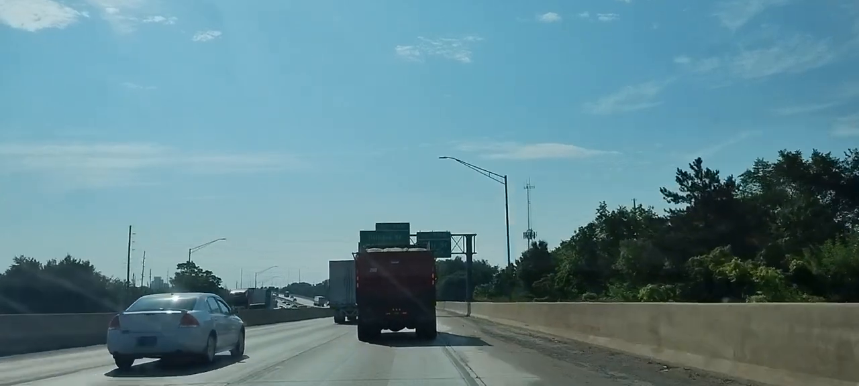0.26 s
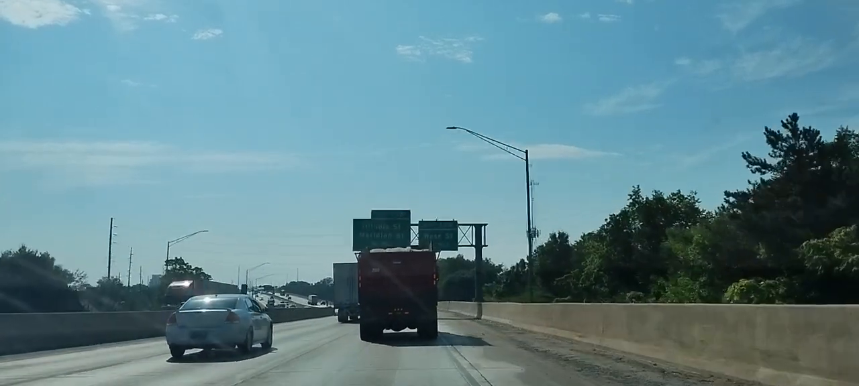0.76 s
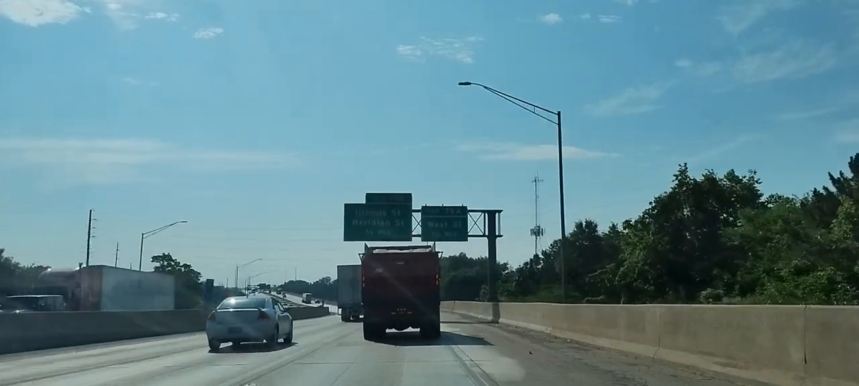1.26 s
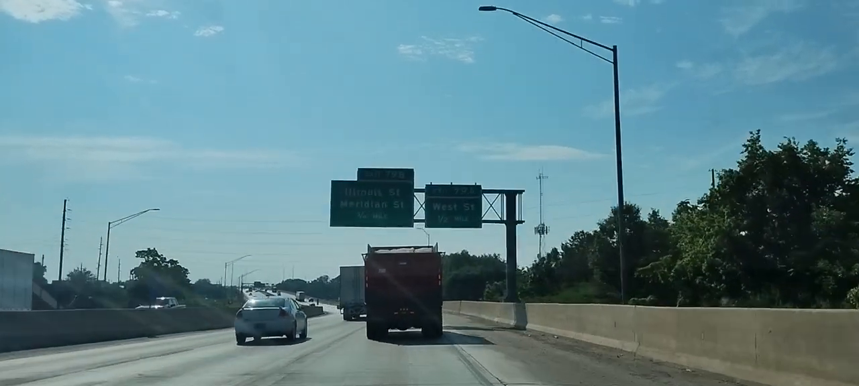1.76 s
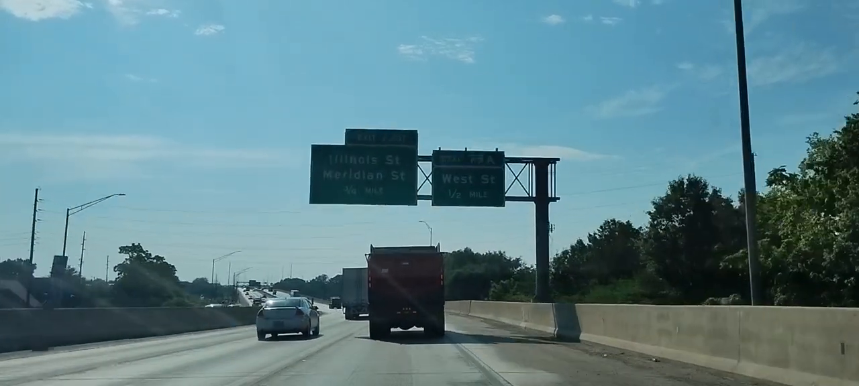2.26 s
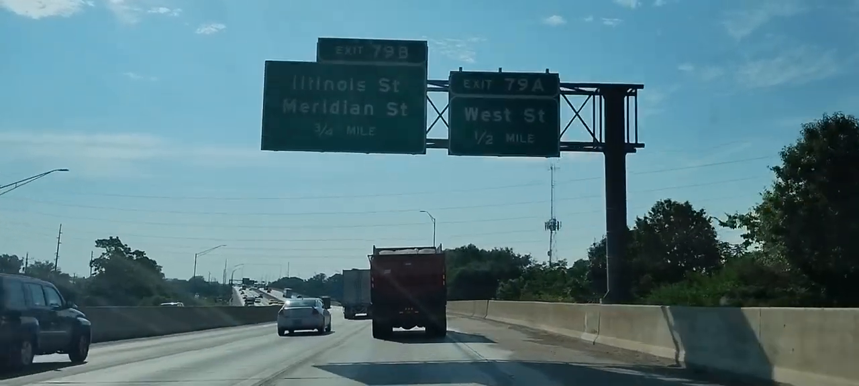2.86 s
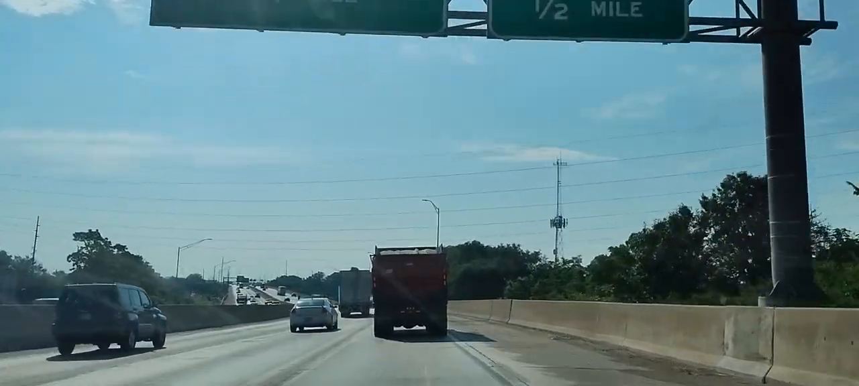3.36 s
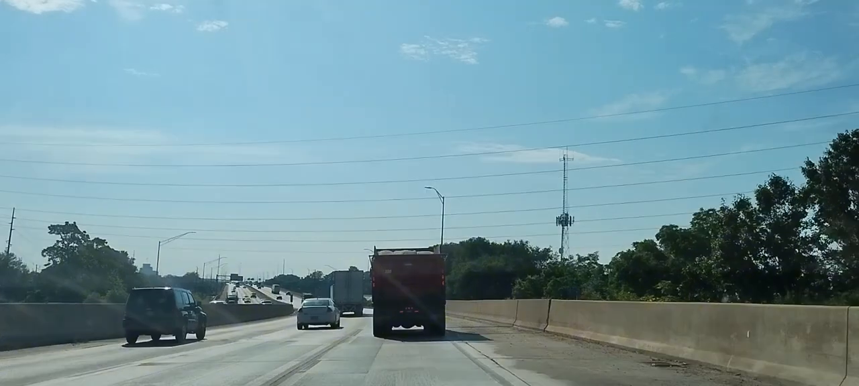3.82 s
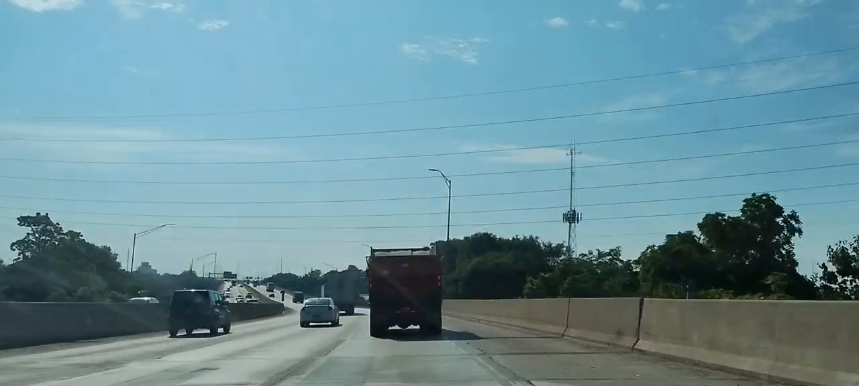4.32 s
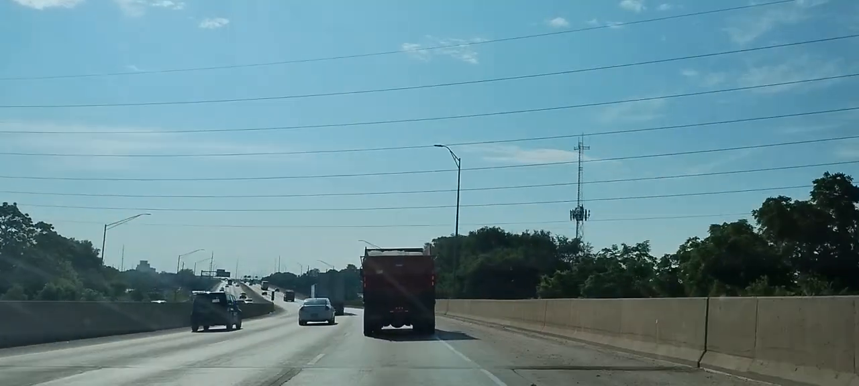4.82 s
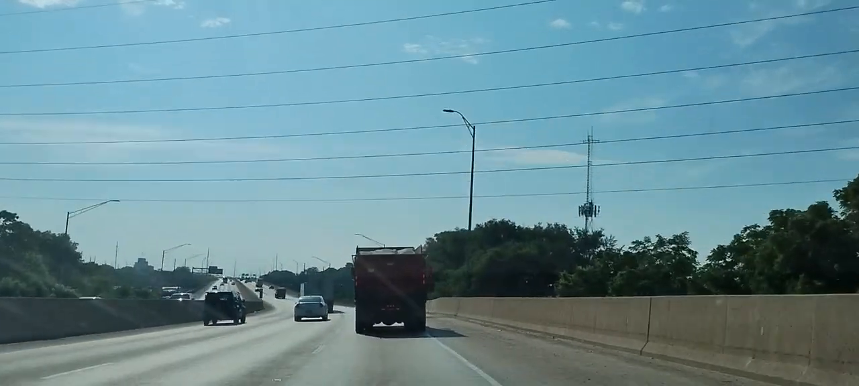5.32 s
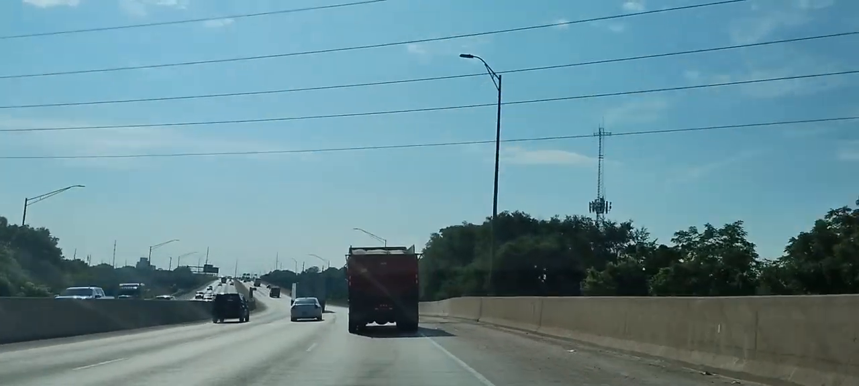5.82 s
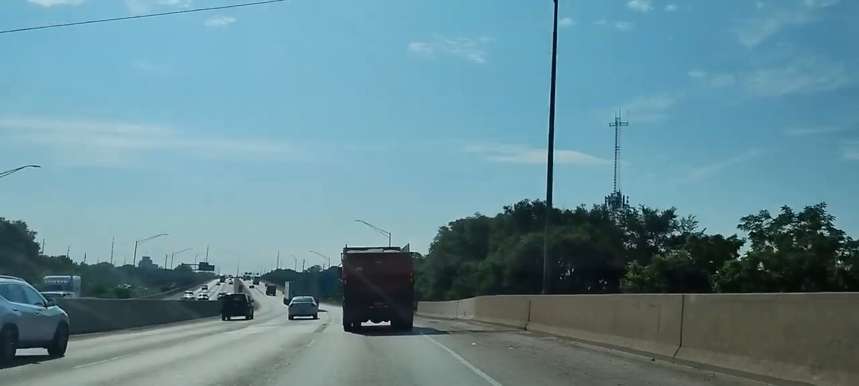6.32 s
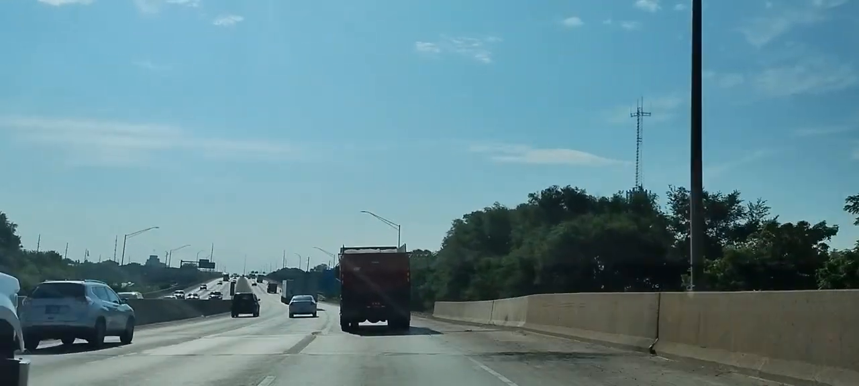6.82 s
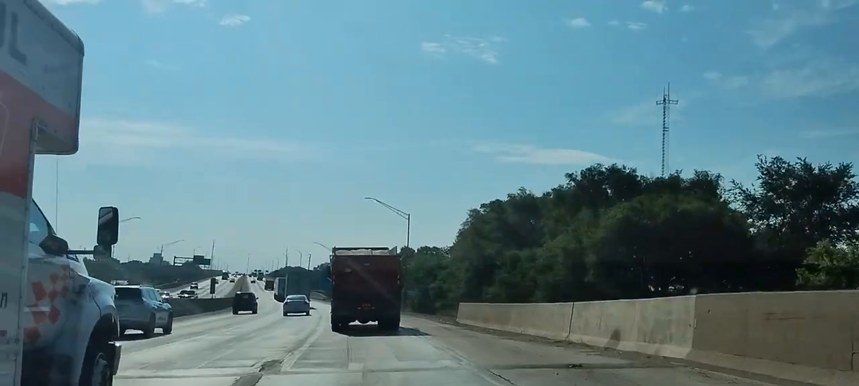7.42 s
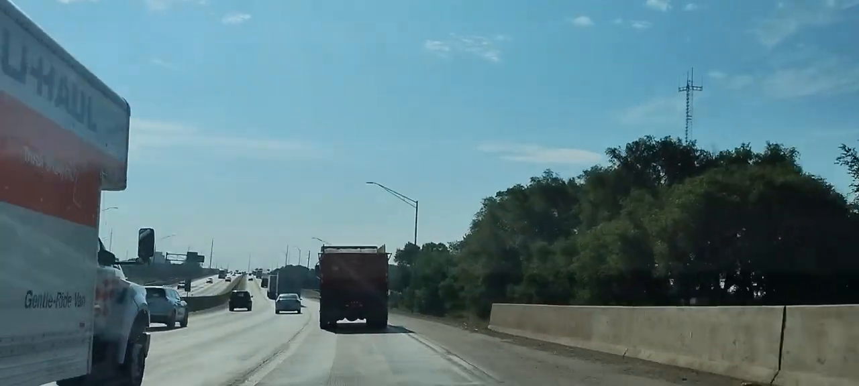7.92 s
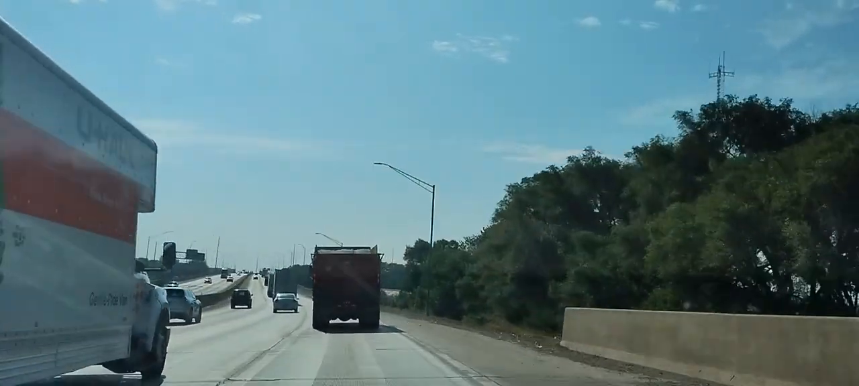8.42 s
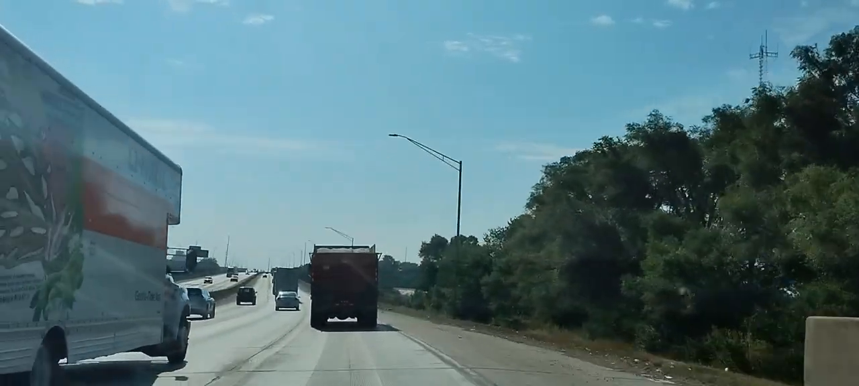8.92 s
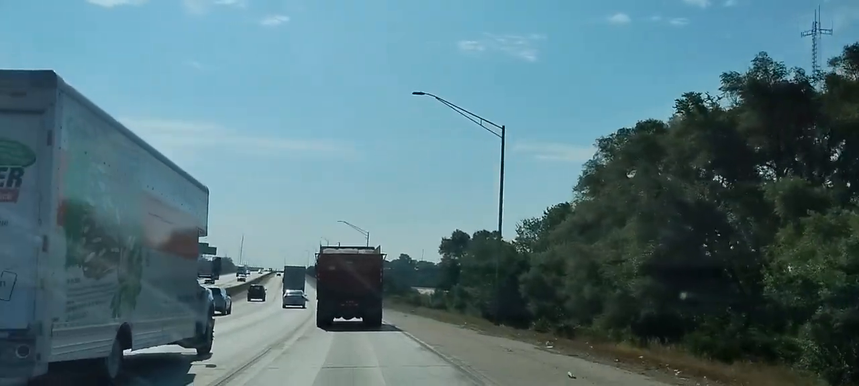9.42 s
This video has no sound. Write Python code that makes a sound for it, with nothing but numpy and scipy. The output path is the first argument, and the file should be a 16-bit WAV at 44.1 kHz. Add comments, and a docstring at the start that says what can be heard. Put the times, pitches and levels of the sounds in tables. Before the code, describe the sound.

Steady low road boom and wind heard in an accelerating car, with thumps over joints, rattling plastic and a truck rumbling past.

```python
"""Road boom inside a car at highway speed: the pavement shakes the body, tyres roar, air hisses past the glass.
The engine pulls harder, shifts down and eases off; the driveline hums as the car gathers speed.
Pavement coarseness drives the rolling noise; joints thump, grooved patches howl, the worst stretches
stir up grit and rattle the trim. Something brushes softly near the microphone; a box truck overtakes."""
import sys
import numpy as np
from scipy.fft import rfft, irfft, next_fast_len
from scipy.io import wavfile
from scipy.ndimage import map_coordinates

SR = 44100
rng = np.random.default_rng(int(sys.argv[2]) if len(sys.argv) > 2 else 0)


def dump_mix(stems):
    """Bounce the given channels to the path in sys.argv[1] as a 16-bit WAV at rate SR."""
    frames = np.atleast_2d(stems).T  # one column per channel
    limited = np.clip(frames, -1, 1)  # hard clip at full scale
    pcm = np.round(limited * 32767).astype(np.int16)
    wavfile.write(sys.argv[1], SR, pcm)


N = 426447
FFT_SIZE = next_fast_len(N + 8192)
SHAFT_START_HZ, SHAFT_HZ_PER_S = 75.2, 0.93

# cabin air boom (frequency [Hz], relative density [dB])
BOOM_SPECTRUM = [(20, -38), (32, -22.5), (45, -19.5), (60, -1), (75, -2), (100, -1.5), (120, 2.5),
                 (138, -9.5), (165, -21.5), (240, -36.5)]
# body panel drone (frequency [Hz], relative density [dB])
PANEL_SPECTRUM = [(82, -25.5), (135, -3.5), (180, -4.5), (225, -4.5), (265, -2.5), (297, -9.5), (332, -6),
                  (372, -16.5), (450, -22), (530, -30.5), (750, -37)]


def road(boom_db, boom_slope, drone_db, drone_slope, flutter_db):
    """Road texture shakes the body: cabin air booms and panels drone over a steady hum."""
    # patches that shake the body more or less (time [s], width [s], gain [dB])
    patches = [(0.55, 0.082, -3.5), (.78, 0.59, 4), (1.26, 0.38, 3), (2.132, 0.16, 3.5), (4.351, 0.13, 0.5),
               (5.654, 0.14, 3.5), (6.696, 0.48, 0.5), (7.672, 0.25, 5.5), (8.192, 0.22, 5)]
    # cabin hum (time [s], level [dB])
    hum_levels = [(0, -37.5), (1, -42.5), (2.9, -39), (6.6, -40), (8.8, -43.5), (9.4, -38)]
    # cabin hum (frequency [Hz], relative density [dB])
    hum_spectrum = [(200, -14), (340, -10), (400, -1), (422, -5.5), (450, 2), (485, -8.5), (540, -13),
                    (800, -29.5)]
    coarse_db = coarseness_db()
    texture_db = sum(db * swell(s, width) for s, width, db in patches) + flutter_db * wobble(12)
    boom = amp(boom_db + boom_slope * coarse_db + texture_db) * cabin_noise(BOOM_SPECTRUM)
    drone = amp(drone_db + drone_slope * coarse_db + texture_db) * cabin_noise(PANEL_SPECTRUM)
    hum = amp(curve(hum_levels) + flutter_db * wobble(7.1)) * cabin_noise(hum_spectrum)
    return boom + drone + hum


def dips(gain_db, wander_hz):
    """The body heaves over each dip; the cabin answers with a deep swell."""
    # heaves (time [s], width [s], relative level [dB], pitch [Hz])
    heaves = [(0.703, 0.12, -26, 94), (0.857, 0.19, -29, 93), (1.27, 0.14, -28, 92.5),
              (2.17, 0.093, -31, 98.3), (3.847, 0.36, -27.5, 93.3), (4.206, 0.11, -19, 92.1),
              (4.493, 0.17, -26.5, 94), (5.3, 0.14, -22.5, 92), (5.348, 0.2, -31, 53.6),
              (5.686, 0.13, -19, 95.6), (5.75, 0.14, -20, 58.8), (6.98, 0.3, -22.5, 80),
              (8.24, 0.12, -17, 100), (9.307, .06, -17.5, 88), (9.397, 0.07, -18.5, 78)]
    offset_hz = wander_hz * wobble(35)
    return sum(amp(db + gain_db) * swell(s, width) * unit(np.sin(phase(hz + offset_hz)))
               for s, width, db, hz in heaves)


def shudder(level_db, slope):
    """Coarse pavement makes the whole body shudder."""
    # body shudder (frequency [Hz], relative density [dB])
    spectrum = [(18, -13.5), (30, -7.5), (42, 0), (52, 4.5), (70, -15.5)]
    return amp(level_db + slope * coarseness_db()) * cabin_noise(spectrum)


def engine(coast_db, pull_db, revs_db, waver_db, drift_hz, cut_db, swirl_db, swirl_hz, swirl_t60_s):
    """Low orders: pitch is shaft rate times gear; level follows throttle and gear, sags in the shift."""
    # engine orders (multiple of firing rate [-], relative level [dB])
    orders = [(3 / 5, -21.5), (1, 0), (8 / 5, -21)]
    # accelerator (time [s], throttle [0-1])
    pedal = [(0, 0.5), (.6, 0.07), (2.6, 0.01), (3.6, 0.63), (5.2, 0.88), (6.3, 0.96), (7.58, .97),
             (7.75, 0.47), (8.6, 0.72), (9.3, 0.22)]
    top_gear, lower_gear = 0.892, 1.153  # firings per shaft turn
    shift_at_s, shift_s = 6.14, 0.095
    throttle = np.clip(curve(pedal), 0, 1)
    shifted = ramp(shift_at_s, shift_s)
    gear = top_gear + (lower_gear - top_gear) * shifted
    converter_slip = 1 + 0.008 * throttle
    overshoot_hz = 5.41 * swell(shift_at_s + 0.19, 0.299)
    firing_hz = shaft_hz() * gear * converter_slip + overshoot_hz
    angle = phase(firing_hz + drift_hz * wobble(6))
    drone = unit(sum(amp(db + waver_db * wobble(6.9)) * np.sin(k * angle) for k, db in orders))
    # after the shift the note swirls between left and right, then settles
    detuned = unit(np.sin(angle + 2 * np.pi * swirl_hz * (clock() - shift_at_s)))
    swirl = amp(swirl_db) * blow(shift_at_s, shift_s, swirl_t60_s) * detuned
    level_db = coast_db + pull_db * throttle + revs_db * shifted + cut_db * swell(shift_at_s, shift_s)
    return amp(level_db) * (drone + np.array([swirl, -swirl]))


def driveline(hum_db, hum_db_per_hz, octave_db, octave_db_per_hz, waver_db):
    """The shaft hums: as it speeds up, its fundamental grows and its octave fades."""
    angle = phase(shaft_hz())
    rise_hz = shaft_hz() - SHAFT_START_HZ
    hum_gain = amp(hum_db + hum_db_per_hz * rise_hz + waver_db * wobble(2.7))
    octave_gain = amp(octave_db + octave_db_per_hz * rise_hz + waver_db * wobble(2.9))
    return hum_gain * unit(np.sin(angle)) + octave_gain * unit(np.sin(2 * angle))


def joints(thump_db, slap_db, thump_t60_s, slap_t60_s):
    """Each joint slaps the front tyres, then the rear more softly, and sets the cabin booming."""
    # road joints (time [s], relative thump [dB], relative slap [dB])
    hits = [(0.614, -18, -29.5), (1.212, -18, -38), (2.073, -31, -36), (2.846, -24.5, -34),
            (4.17, -18, -58), (5.605, -13, -39), (5.985, -20, -36.5), (7.688, -12, -32),
            (8.187, -16.5, -32), (8.453, -22, -28), (9.261, -14, -28)]
    # tyre slap (frequency [Hz], relative density [dB])
    slap_spectrum = [(200, -17.5), (420, 1), (580, -12), (689, -3.5), (780, -10), (900, -6.5), (1030, 1.5),
                     (1180, -13.5), (1350, -16.5), (2500, -40)]
    axles = [(0, 0), (0.12, -12.5)]  # front, rear (lag [s], gain [dB])
    thump = sum(amp(db + thump_db + axle_db) * blow(s + lag, 0.0014, thump_t60_s)
                for s, db, _ in hits for lag, axle_db in axles)
    slap = sum(amp(db + slap_db + axle_db) * blow(s + lag, 0.001, slap_t60_s)
               for s, _, db in hits for lag, axle_db in axles)
    body = cabin_noise(BOOM_SPECTRUM) + amp(-7.5) * cabin_noise(PANEL_SPECTRUM)
    return thump * body + slap * cabin_noise(slap_spectrum)


def tyres_and_wind(roar_db, roar_slope, wind_db, wind_slope, hiss_db, hiss_slope, flutter_db):
    """Tyre roar, rushing air and thin hiss come through the glass; each grows with coarseness."""
    # roar, wind and hiss (frequency [Hz], relative density [dB])
    roar_spectrum = [(290, -26), (480, -4.5), (560, -2.5), (620, -0.5), (700, 0.5), (790, 1.5), (930, -6.5),
                     (1100, -3), (1250, -6), (1450, -5.5), (1650, -20), (2100, -41)]
    wind_spectrum = [(790, -33), (1300, -4.5), (1450, 2), (1640, 2), (1850, 4), (2200, 1.5), (2480, 2.4),
                     (2800, -3.5), (3080, -8), (3260, -13.5), (3900, -20.5), (5000, -44)]
    hiss_spectrum = [(1500, -24.5), (2800, -4.5), (3500, -6), (4100, -7), (5000, -10), (5400, -9.5),
                     (5900, -11), (7500, -16), (10000, -17), (12500, -19.5), (14200, -29)]
    coarse_db = coarseness_db()
    gust_db = flutter_db * wobble(9)
    roar = amp(roar_db + roar_slope * coarse_db + gust_db) * cabin_noise(roar_spectrum)
    wind = amp(wind_db + wind_slope * coarse_db + gust_db / 2) * cabin_noise(wind_spectrum)
    hiss = amp(hiss_db + hiss_slope * coarse_db + gust_db / 2) * cabin_noise(hiss_spectrum)
    return roar + wind + hiss


def growl(level_db, slope, flutter_db):
    """On coarse pavement the tread adds a brighter, fluttering growl."""
    # tread growl (frequency [Hz], relative density [dB])
    spectrum = [(600, -32), (850, -5), (980, -1.5), (1120, -5.5), (1300, -18), (2600, -22), (3300, -36.5)]
    return amp(level_db + slope * coarseness_db() + flutter_db * wobble(22)) * cabin_noise(spectrum)


def whine(cycles_per_turn, fade_s):
    """On some stretches the tread sings a note and its lower octave; pitch follows road speed."""
    # stretches (start [s], length [s], level [dB], lower octave gain [dB], blur [Hz], waver [dB])
    stretches = [(1.8, .9, -56.5, -10, 2, 2), (3.35, .35, -54, -10, 2, 2), (4.69, .1, -42, 4.5, 1.5, .5),
                 (4.84, .34, -44.5, 3, 1.5, 1), (5.5, 2.4, -50.5, -3, 3.5, 2.5),
                 (8.49, .12, -42.5, -15, 6, 1.5), (8.9, .4, -47, -10, 4.5, 2)]
    pitch_hz = cycles_per_turn * shaft_hz()
    blur, waver = wobble(70), wobble(25)
    song = np.zeros(N)
    for s, length, db, lower_db, blur_hz, waver_db in stretches:
        angle = phase(pitch_hz + blur_hz * blur)
        note = np.sqrt(2) * (np.sin(angle) + amp(lower_db) * np.sin(angle / 2))
        gate = ramp(s, fade_s) - ramp(s + length, fade_s)
        song += amp(db + waver_db * waver) * gate * note
    return song


def howls(width_hz):
    """Grooved pavement narrows the tread's roar into brief, fuzzy notes."""
    # grooved patches (time [s], width [s], pitch [Hz], level [dB])
    grooves = [(5.74, .16, 878, -42), (7.706, 0.06, 1100, -43), (7.963, 0.045, 1030, -43),
               (8.127, .1, 900, -44), (8.45, 0.13, 976, -43)]
    band = unit(wobble(width_hz) + 1j * wobble(width_hz))
    return sum(amp(db) * swell(s, width) * unit(np.real(band * np.exp(2j * np.pi * hz * clock())))
               for s, width, hz, db in grooves)


def truck(level_db, flutter_db, abreast_s, pass_s):
    """An overtaking truck's rumble and tyre roar swell and fade."""
    # truck through the side window (frequency [Hz], relative density [dB])
    spectrum = [(45, 0), (70, 14.5), (125, 16), (170, -0.5), (300, -10), (450, -0.5), (560, -9.5),
                (680, -1.5), (820, 4), (1120, -2.5), (1300, -10.5), (1700, -12.5), (3000, -39)]
    return amp(level_db + flutter_db * wobble(8)) * swell(abreast_s, pass_s) * cabin_noise(spectrum)


def trim(rattle_db, chatter_db, scatter_db, crack_db, ring_db, ring_t60_s):
    """Loose plastic chatters and ticks; each tick cracks, scatters in the cabin and rings its panel."""
    # rattle bursts (time [s], width [s], relative level [dB])
    rattles = [(5.632, 0.06, -50.5), (5.739, 0.07, -45.5), (5.789, 0.04, -44.5), (5.959, 0.025, -46.5),
               (5.992, .055, -48), (7.662, 0.013, -47.5), (7.721, 0.027, -50.5), (7.877, 0.052, -49.5),
               (7.957, 0.045, -53.5), (8.126, 0.032, -44.5), (8.537, .04, -54.5)]
    # hard ticks (time [s], relative click [dB], relative ring [dB])
    ticks = [(2.619, -50, -56.5), (2.626, -54, -51.5), (5.564, -43, -59.5), (5.574, -52, -53),
             (5.622, -49.5, -40), (5.776, -48.5, -47), (7.656, -46, -53), (7.666, -50, -52.5),
             (7.711, -49.5, -45.5), (7.773, -47, -53), (7.857, -47, -52), (7.913, -47, -57),
             (7.942, -45.5, -55), (8.078, -50.5, -61), (8.147, -40.5, -54), (8.31, -47.5, -62),
             (8.328, -55, -58), (8.394, -38.5, -56), (8.405, -47.5, -61), (8.553, -49.5, -55)]
    # rattle, scatter, contact crack and panel ring (frequency [Hz], relative density [dB])
    rattle_spectrum = [(1200, -6), (2300, 7), (3200, 5), (4400, -1.5), (5400, -16.5), (7500, -23),
                       (11000, -28), (14000, -30)]
    scatter_spectrum = [(1500, -7), (3200, 6), (5500, 5.5), (8500, -7), (11000, -6), (14000, -15.5)]
    crack_spectrum = [(2000, -9), (4500, 1), (8000, 1.5), (12000, -3.5), (14200, -5.5)]
    ring_spectrum = [(1200, -16.5), (2400, 5.5), (3250, 0.5), (3700, -10.5), (4400, -15.5), (5600, -29.5)]
    bursts = sum(amp(db + rattle_db) * swell(s, width) for s, width, db in rattles)
    chatter = unit(amp(chatter_db * wobble(200)))
    scatter = sum(amp(db + scatter_db) * blow(s, 0.0008, t60_s=0.05) for s, db, _ in ticks)
    cracks = sum(amp(db + crack_db) * blow(s, 0.0003, t60_s=0.011) for s, db, _ in ticks)
    rings = sum(amp(db + ring_db) * blow(s, 0.0035, ring_t60_s) for s, _, db in ticks)
    return (bursts * chatter * cabin_noise(rattle_spectrum) + scatter * cabin_noise(scatter_spectrum)
            + cracks * cabin_noise(crack_spectrum) + rings * cabin_noise(ring_spectrum))


def grit(gain_db, rise_s, grain_db, clump_db):
    """Fine grit sizzles against the underbody in clumps, then thins out."""
    # grit sprays (start [s], relative level [dB], t60 [s])
    sprays = [(5.57, -57.5, 13), (7.65, -55.5, 3.4)]
    # sizzle (frequency [Hz], relative density [dB])
    spectrum = [(1500, -21), (2800, 2), (4100, -2.5), (5200, -10), (6200, -9), (7500, -16.5),
                (10000, -20.5), (14200, -30)]
    thrown = sum(amp(db + gain_db) * blow(s, rise_s, t60) for s, db, t60 in sprays)
    grains = unit(amp(grain_db * wobble(600) + clump_db * wobble(25)))
    return thrown * grains * cabin_noise(spectrum)


def brush(gain_db, grain_db):
    """Light, grainy strokes near the right microphone."""
    # strokes (time [s], width [s], relative level [dB])
    strokes = [(4.055, 1.8, -70), (2.665, 0.072, -68.5), (3.068, .06, -72), (3.365, 0.05, -66.5),
               (3.487, 0.025, -65.5), (3.996, 0.15, -59.5), (4.069, 0.06, -51), (4.123, 0.039, -53),
               (4.17, .06, -65)]
    # swish (frequency [Hz], relative density [dB])
    spectrum = [(3000, -25), (4200, -7), (5400, -16), (6900, -13.5), (8300, -6.5), (9600, -5.5),
                (11500, -6.5), (14200, -8.5)]
    envelope = sum(amp(db + gain_db) * swell(s, width) for s, width, db in strokes)
    return envelope * unit(amp(grain_db * wobble(400))) * cabin_noise(spectrum)


def cabin_modes(x, depth_db, spacing_hz):
    """Crowded cabin modes ripple the spectrum above 500 Hz, differently in each channel."""
    hz = np.fft.rfftfreq(FFT_SIZE, 1 / SR)
    ripple = [map_coordinates(rng.standard_normal(2048), [hz / spacing_hz], mode="mirror") for _ in x]
    crowded = np.clip(hz / 500 - 1, 0, 1)
    return irfft(rfft(x, FFT_SIZE) * amp(depth_db * crowded * np.array(ripple)), FFT_SIZE)[:, :N]


def cabin_noise(spectrum):
    """Stereo noise, mid rms 1: alike in the bass, unrelated in the treble."""
    # left-right likeness (frequency [Hz], correlation [-])
    likeness = [(40, 0.5), (100, 0.82), (270, 0.9), (370, 0.54), (500, 0.5), (680, 0.1), (900, -0.1),
                (1300, -0.6), (1750, -0.11), (2100, 0.27), (2700, 0), (8000, 0)]
    # balance (frequency [Hz], left minus right [dB])
    balance = [(80, 0.5), (150, 1.3), (270, -0.5), (340, 4), (450, 6), (560, 0.5), (1500, -1.5),
               (2200, 0.4), (2800, 4.5), (3400, 1), (4400, -2), (6000, -5), (8500, -9.5), (14000, -9.5)]
    hz = np.fft.rfftfreq(FFT_SIZE, 1 / SR)
    spread = np.arccos(np.clip(along(likeness, hz), -1, 1)) / 2
    skirt = 1 / (1 + (hz / (1.4 * spectrum[-1][0])) ** 8)
    shaped = rfft(rng.standard_normal((2, FFT_SIZE))) * amp(along(spectrum, hz)) * skirt
    mid, side = shaped * [np.cos(spread), np.sin(spread)]
    lean = amp(along(balance, hz) / 2)
    pair = irfft(np.array([(mid + side) * lean, (mid - side) / lean]), FFT_SIZE)[:, :N]
    return pair / np.std(pair.mean(axis=0))


def coarseness_db(smooth_db=-45):
    """Pavement coarseness above smooth road."""
    # pavement (time [s], rolling noise [dB])
    pavement = [(0.1, -45), (0.88, -44), (1.22, -44.5), (3.48, -43), (4.94, -40), (5.13, -37.5),
                (5.5, -35.5), (5.75, -35), (6.1, -36.5), (6.59, -38), (7.51, -39), (7.9, -36.5),
                (8.37, -38), (8.77, -42), (9.5, -44)]
    return curve(pavement) - smooth_db


def shaft_hz():
    """Drive shaft rate, in step with road speed."""
    return SHAFT_START_HZ + SHAFT_HZ_PER_S * clock()


def amp(db):
    """Decibels to gain."""
    return 10 ** (np.asarray(db) / 20)


def unit(x):
    """Scaled to rms 1."""
    return x / np.sqrt(np.mean(x ** 2) + 1e-20)


def along(points, hz):
    """(Hz, value) points read on a log axis."""
    f, v = np.transpose(points)
    return np.interp(np.log(hz + 1), np.log(f + 1), v)


def clock():
    """Sample times [s]."""
    return np.arange(N) / SR


def curve(points):
    """(time, value) points read at every sample."""
    return np.interp(clock(), *np.transpose(points))


def wobble(rate_hz):
    """Smooth random curve, rate_hz knots a second."""
    return map_coordinates(rng.standard_normal(int(N * rate_hz / SR) + 4), [clock() * rate_hz])


def phase(hz):
    """Running angle of a changing frequency."""
    return 2 * np.pi * np.cumsum(hz) / SR


def blow(start_s, attack_s, t60_s):
    """Quick rise, exponential decay."""
    age_s = np.clip(clock() - start_s, 0, 2 * t60_s)
    return (1 - np.exp(-age_s / attack_s)) * np.exp(-np.log(1000) * age_s / t60_s)


def swell(centre_s, width_s):
    """Gaussian rise and fall."""
    return np.exp(-2 * ((clock() - centre_s) / width_s) ** 2)


def ramp(centre_s, length_s):
    """Linear rise from 0 to 1."""
    return np.clip((clock() - centre_s) / length_s + .5, 0, 1)


def scene():
    """The mix at the dashboard; slopes are dB per dB of pavement coarseness."""
    rumble = road(boom_db=-35.5, boom_slope=1.74, drone_db=-35.0, drone_slope=1.0, flutter_db=1)
    rumble += dips(gain_db=-1, wander_hz=4.92)
    rumble += shudder(level_db=-53.5, slope=1.8)
    rush = tyres_and_wind(roar_db=-47.5, roar_slope=0.94, wind_db=-52.5, wind_slope=0.93,
                          hiss_db=-70.5, hiss_slope=0.8, flutter_db=1.1)
    rush += growl(level_db=-57.5, slope=1.73, flutter_db=2.4)
    rush += grit(gain_db=2.0, rise_s=0.04, grain_db=1.0, clump_db=1.5)
    rush += truck(level_db=-33.5, flutter_db=2, abreast_s=8.53, pass_s=1.5)
    tones = engine(coast_db=-40.5, pull_db=21.0, revs_db=1.5, waver_db=1.5, drift_hz=0.45, cut_db=-8.0,
                   swirl_db=-5.5, swirl_hz=0.44, swirl_t60_s=7)
    tones += whine(cycles_per_turn=8.31, fade_s=0.044) + howls(width_hz=90)
    tones += driveline(hum_db=-42.5, hum_db_per_hz=1.45, octave_db=-40.5, octave_db_per_hz=-0.94,
                       waver_db=2.2)
    contacts = joints(thump_db=-5.0, slap_db=-1.0, thump_t60_s=0.46, slap_t60_s=0.16)
    contacts += trim(rattle_db=-0.5, chatter_db=3.5, scatter_db=-5, crack_db=-5, ring_db=4,
                     ring_t60_s=0.11)
    contacts += brush(gain_db=-2.5, grain_db=1.5)
    return rumble + tones + cabin_modes(rush + contacts, depth_db=1.76, spacing_hz=35.27)


def record(dry):
    """Brick-wall low-pass."""
    top_hz = 14250
    passband = np.fft.rfftfreq(FFT_SIZE, 1 / SR) < top_hz
    return irfft(rfft(dry, FFT_SIZE) * passband, FFT_SIZE)[:, :N]


dry = scene()
out = record(dry)
dump_mix(out)
```